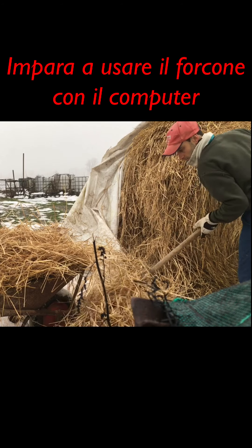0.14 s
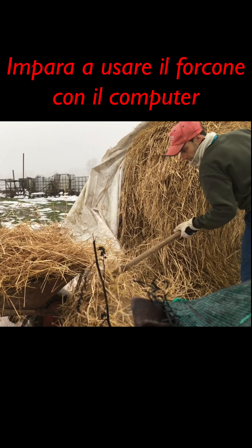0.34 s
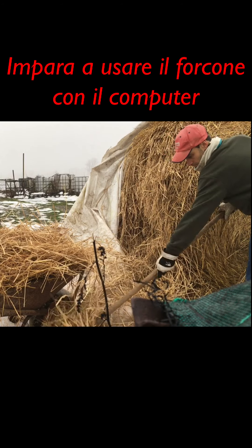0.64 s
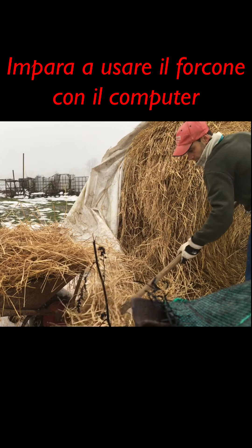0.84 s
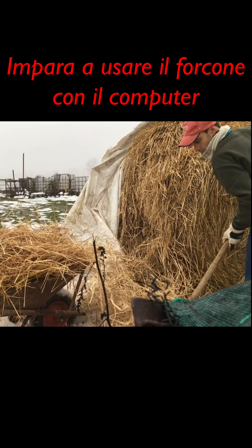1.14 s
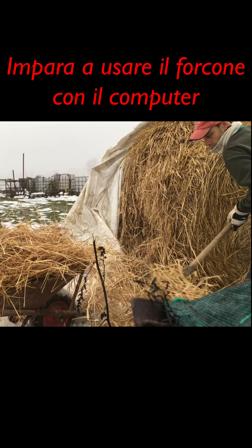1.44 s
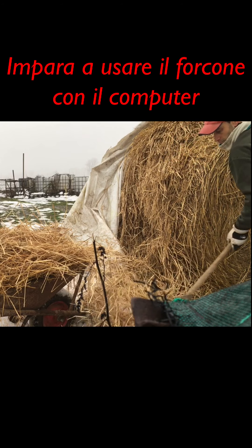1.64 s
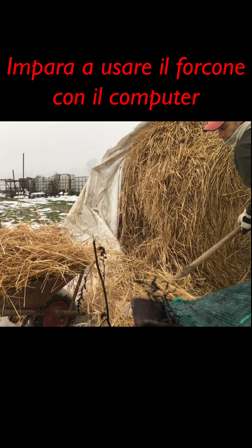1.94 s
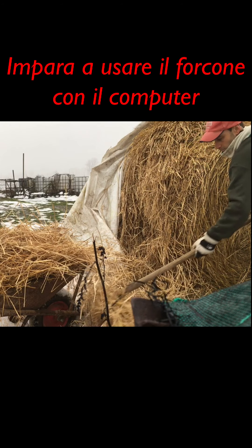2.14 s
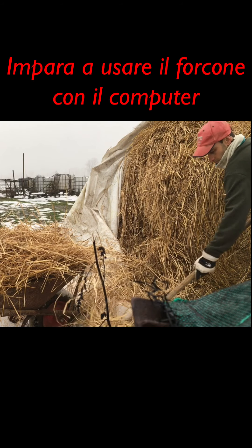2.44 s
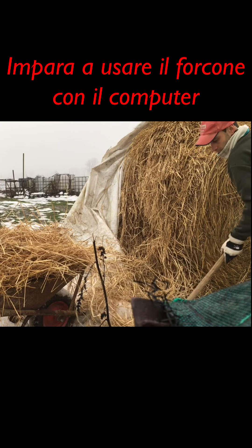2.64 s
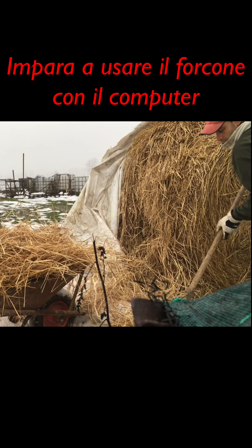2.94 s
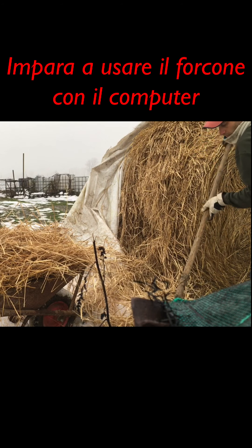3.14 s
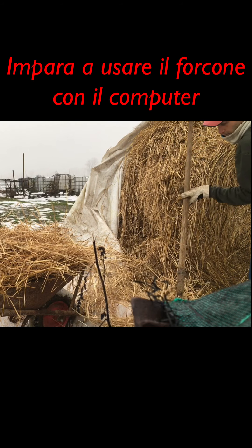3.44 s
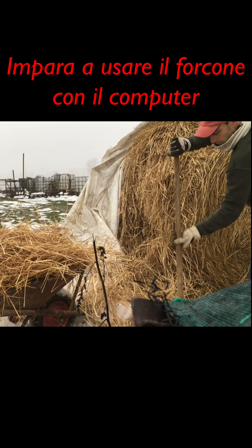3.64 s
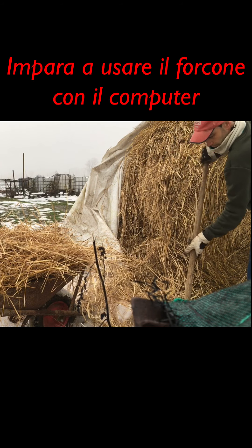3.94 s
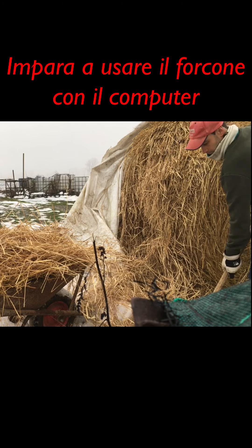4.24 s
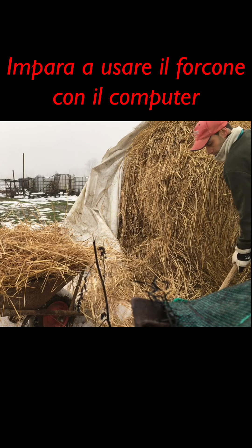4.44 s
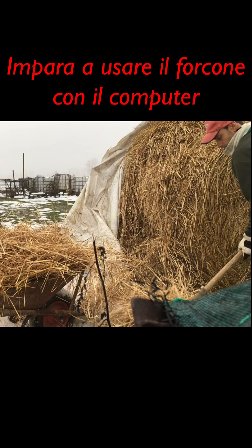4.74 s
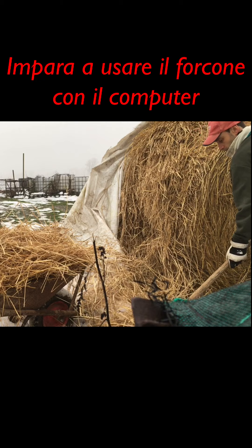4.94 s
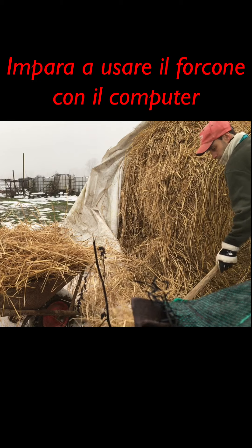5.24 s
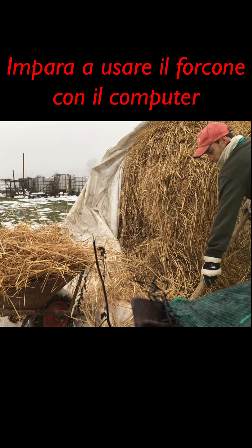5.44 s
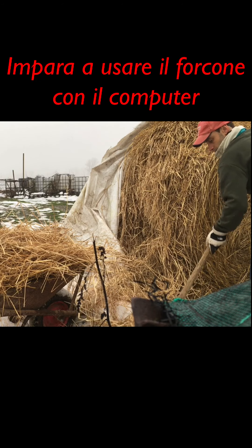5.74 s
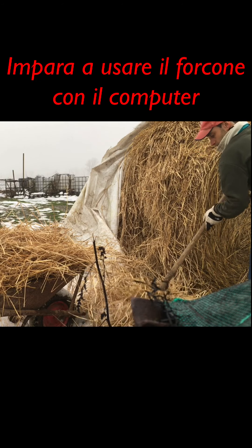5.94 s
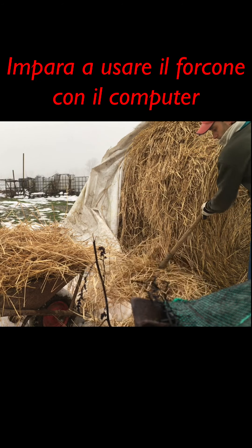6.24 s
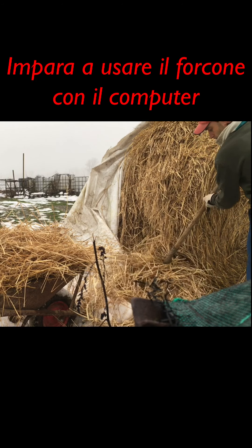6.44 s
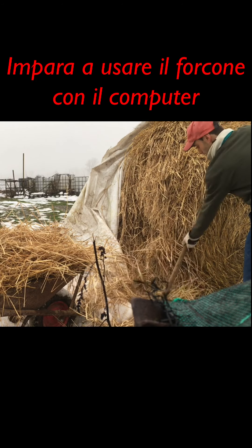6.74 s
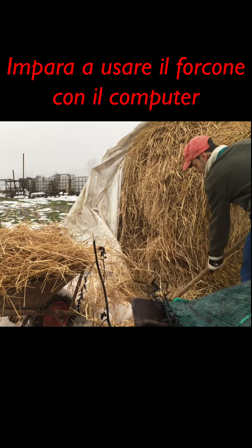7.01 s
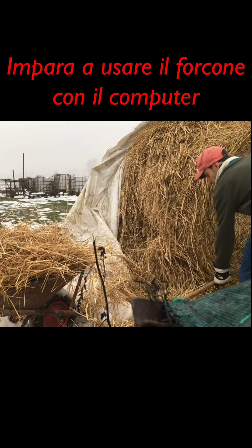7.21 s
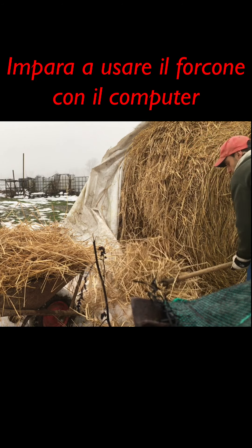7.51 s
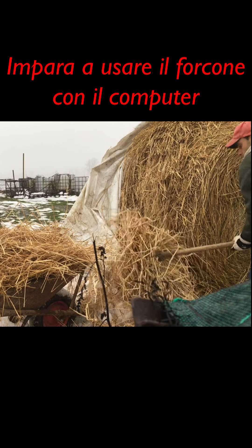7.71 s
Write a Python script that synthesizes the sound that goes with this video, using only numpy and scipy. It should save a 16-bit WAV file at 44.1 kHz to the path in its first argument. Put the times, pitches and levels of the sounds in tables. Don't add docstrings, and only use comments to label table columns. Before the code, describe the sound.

Dry straw rustles and crackles in sweeping fork strokes, with a hen clucking briefly, stems snapping, hollow knocks and a faint distant cock crow.

```python
import sys
import numpy as np
from scipy import signal
from scipy.fft import rfft, irfft, next_fast_len
from scipy.io import wavfile
from scipy.ndimage import uniform_filter1d, map_coordinates

SR = 44100
rng = np.random.default_rng(int(sys.argv[2]) if len(sys.argv) > 2 else 0)


def file_out(sig):
    cols = np.atleast_2d(sig).T
    lim = np.clip(cols, -1, 1)
    pcm = np.round(lim * 32767).astype(np.int16)
    wavfile.write(sys.argv[1], SR, pcm)


def rack_gain(trim_db):
    fader = np.asarray(trim_db, float)
    return 10 ** (fader / 20)


N = 347067


def unit(x):
    return x / np.sqrt(np.mean(x ** 2) + 1e-20)


def along(points, hz):
    f, v = np.transpose(points)
    return np.interp(np.log(hz + 1), np.log(f + 1), v)


def curves(rows, t):
    s, *cols = np.transpose(rows)
    return [np.interp(t, s, c) for c in cols]


def wobble(rate):
    knots = rng.standard_normal(int(N * rate / SR) + 4)
    return map_coordinates(knots, [np.arange(N) * rate / SR])


def coloured(x, gain):
    m = next_fast_len(x.shape[-1] + 8192)
    return irfft(rfft(x, m) * gain(np.fft.rfftfreq(m, 1 / SR)), m)[..., :x.shape[-1]]


def add(track, s, sound):
    part = track[round(s * SR):][:len(sound)]
    part += sound[:len(part)]


# drag below, crackle between, rustle above [f/Hz]
SPLIT_HZ = [1494, 5470]


def thirds(hz):
    low = 1 / (1 + (hz / SPLIT_HZ[0]) ** 6)
    high = 1 / (1 + (SPLIT_HZ[1] / (hz + 1)) ** 10)
    return np.sqrt(np.abs([low, (1 - low) * (1 - high), high]))


def patchy_noise(patchy_db):
    z = signal.stft(rng.standard_normal(N + 512), nperseg=256)[2]
    field = uniform_filter1d(rng.standard_normal(z.shape), 6, 0)
    field = uniform_filter1d(field, 10, 1)
    return unit(signal.istft(z * rack_gain(patchy_db * unit(field)), nperseg=256)[1][:N])


# [f/Hz, density/dB]
RUMBLE = [(15, -45), (25, -46), (39, -1), (53, 1), (68, 2.5), (77, -6.5), (85, 8), (93, -4), (100, 3),
          (112, -7), (160, -10.5), (220, -22.5), (300, -39), (500, -44)]
# [f/Hz, density/dB]
AIR = [(120, -22), (200, 5.5), (455, -9), (816, -7), (2030, -17.5), (2820, -6.5), (4880, -14.5),
       (9250, -8.5), (15700, -6)]


def yard():
    rumble_db, sway_db, hiss_db = -50.5, 1, -60
    rumble = unit(coloured(rng.standard_normal(N), lambda hz: rack_gain(along(RUMBLE, hz))))
    hiss = unit(coloured(patchy_noise(patchy_db=3.5), lambda hz: rack_gain(along(AIR, hz))))
    return rack_gain(rumble_db + sway_db * wobble(4.14)) * rumble + rack_gain(hiss_db) * hiss


# [t/s, length/s, f/Hz, level/dB]
CROW = [
    (5.38, 0.73, 701, -71.5),
    (6.265, 0.15, 700, -69),
    (6.41, .06, 693, -72.5),
    (6.585, .065, 817, -68),
    (6.67, 0.083, 875, -73),
    (6.745, 0.06, 810, -70),
]


def crow():
    out, waver = np.zeros(N), wobble(35)
    for s, length, hz, db in CROW:
        t = np.arange(0, length, 1 / SR)
        level = rack_gain(db + 5.5 + 1.7 * waver[round(s * SR):][:len(t)])
        swell = np.abs(np.sin(np.pi * t / length))
        add(out, s, level * swell * np.sin(2 * np.pi * hz * t))
    return out


def hen_call(slur, cluck, pitch):
    s, rise, hold, top, db = slur
    catch_db, break_db, cluck_db, overtone_db, half = cluck
    sagged, mid, low, length, _ = pitch
    onset_s, break_s, fade_s = .006, .0045, .006
    onset_db, start = -2, .71
    end = s + rise + hold
    press = end + 2 * break_s
    done = press + length
    dull = 20 * (low > 900)
    return [(s, start * top, db - 14, -25, 0),
            (s + min(onset_s, rise / 2), (start + .13) * top, db + onset_db, -25, 0),
            (s + rise, top, db, -24, 0),
            (s + rise + .6 * hold, .97 * top, db + catch_db, -25, 0),
            (end, sagged, break_db, -25, 0),
            (end + break_s, mid, .4 * break_db + .6 * cluck_db - 2, overtone_db - 9, .5 * half),
            (press, low, cluck_db, overtone_db, half),
            (done, low, cluck_db - 6, overtone_db - 2 - dull, .6 * half),
            (done + fade_s, low, cluck_db - 24, overtone_db - 4 - dull, .5 * half)]


# [t/s, rise/s, hold/s, top f/Hz, level/dB]
SLURS = [
    (2.054, .014, .027, 1360, -56.5),
    (2.215, .010, .028, 1440, -47),
    (2.324, .006, .023, 1170, -67),
    (2.643, .025, .013, 1390, -45),
    (2.753, .028, .012, 1380, -47),
]
# [catch before break/dB, voice break/dB, level/dB, overtones/dB, half-pitch share/1]
CLUCKS = [
    (-8, -56, -57, -6, .6),
    (-3, -40, -50, 7, 0.1),
    (1, -56, -65, 13, 0),
    (1, -46.5, -56.5, 14, 0.3),
    (0, -45, -55, 10.5, 0.55),
]
# [before break f/Hz, in break f/Hz, cluck f/Hz, cluck length/s, highest overtone by beak opening f/Hz]
CLUCK_HZ = [
    (1260, 850, 1060, .018, 2000),
    (1330, 900, 555, .005, 1400),
    (1050, 610, 603, .004, 2200),
    (1200, 640, 610, .008, 3200),
    (1250, 800, 625, .007, 3200),
]
# [f/Hz, gain/dB]
THROAT = [(300, -25), (900, -6), (1200, 3.5), (1800, 3.5), (2400, -2), (3000, -17), (4000, -40)]


def hen():
    out = np.zeros(N)
    for slur, cluck, pitch in zip(SLURS, CLUCKS, CLUCK_HZ):
        call, beak_hz = hen_call(slur, cluck, pitch), pitch[-1]
        t = np.arange(call[0][0], call[-1][0], 1 / SR)
        hz, db, overtone_db, half = curves(call, t)
        order = np.arange(3, 13)[:, None] / 2
        share = np.where(order % 1, np.clip(half, 0, 1), 1)
        share = share / (1 + (order * hz / beak_hz) ** 10)
        phase = 2 * np.pi * np.cumsum(hz) / SR
        overtones = (share * rack_gain(along(THROAT, order * hz)) * np.sin(order * phase)).sum(axis=0)
        add(out, t[0], rack_gain(db) * (np.sin(phase) + rack_gain(overtone_db) * overtones))
    t = np.arange(SR // 5) / SR
    echo = rng.standard_normal(len(t)) * rack_gain(-60 * t / 0.068)
    return out + rack_gain(-13) * signal.fftconvolve(out, echo / np.linalg.norm(echo))[:N]


# [t/s, peak/dB, f/Hz]
HOLLOW = [(4.4798, -25.5, 414), (4.483, -29, 370), (4.528, -31, 690), (6.812, -37, 660), (6.87, -46, 680),
          (4.4785, -38, 1000), (4.526, -34, 900), (4.6085, -23.5, 1090), (4.6105, -22.5, 697),
          (4.616, -33, 800), (6.219, -40.5, 500), (5.695, -42, 860), (5.832, -41, 1000), (6.798, -37, 695),
          (6.814, -49, 323), (7.437, -47, 500), (7.471, -44, 850), (7.485, -44, 980), (7.495, -46, 650),
          (7.505, -44, 1150), (7.519, -43, 700), (7.545, -45, 800), (7.559, -36.5, 700), (7.560, -41, 1550),
          (7.565, -43, 1050), (7.577, -39, 690), (7.589, -42, 720), (7.594, -47, 377), (7.602, -44, 1050),
          (7.647, -41, 977), (7.648, -46, 1500), (7.728, -37.5, 1120), (7.749, -46, 993),
          (7.796, -41.5, 670), (7.797, -47, 1300), (7.833, -43, 1280), (7.834, -49, 800)]
# [t/s, peak/dB]
THUMPS = [(0.901, -48), (1.247, -49), (3.739, -59), (3.753, -41), (4.476, -42), (4.523, -37.5),
          (4.61, -34.5), (4.69, -49), (5.83, -45), (6.799, -45), (6.815, -38.5), (7.47, -46.5),
          (7.565, -42.5), (7.595, -48)]


def thuds():
    hollow_t60, thump_t60 = 0.023, 0.11
    out, t = np.zeros(N), np.arange(SR // 5) / SR
    for s, db, hz in HOLLOW:
        note = np.sin(2 * np.pi * hz * t) * (1 - np.exp(-t / 0.0013))
        add(out, s, rack_gain(db - 2 - 60 * t / hollow_t60) * note)
    for s, db in THUMPS:
        puff = coloured(rng.standard_normal(len(t)), lambda f: np.exp(-(np.log((f + 1) / 190) / 0.73) ** 2))
        add(out, s, rack_gain(db - 4.5 - 60 * t / thump_t60) * unit(puff) * (1 - np.exp(-t / 0.0035)))
    return out


# [f/Hz, level/dB, t60/s]
TINES = [(2260, 5, 0.024), (2490, -4, 0.033), (1860, -10, .02)]
# [f/Hz, t60/s, rise/s]
UPPER_TINE = (3740, 0.034, 0.0047)
# [t/s, peak/dB, upper mode/dB]
STRIKES = [
    (0.8869, -40, -3),
    (0.9133, -42, -14),
    (1.0267, -38, 3),
    (1.0715, -39.5, -2),
]


def tines():
    out, t = np.zeros(N), np.arange(SR // 10) / SR
    upper_hz, upper_t60, upper_rise = UPPER_TINE
    upper = rack_gain(-60 * t / upper_t60) * np.sin(2 * np.pi * upper_hz * t)
    upper *= 1 - np.exp(-(t / upper_rise) ** 2)
    for s, db, upper_db in STRIKES:
        ring = np.zeros(len(t))
        for hz, level, t60 in TINES:
            ring += rack_gain(level + rng.normal(0, 1.3) - 60 * t / t60) * np.sin(2 * np.pi * hz * t)
        ring *= 1 - np.exp(-t / .001)
        damped = rack_gain(2.2 * uniform_filter1d(rng.standard_normal(len(t)), size=60) * 8)
        add(out, s, rack_gain(db - 3) * damped * (ring + rack_gain(upper_db + 8) * upper))
    return out


# [t/s, peak/dB, f/Hz, t60/s]
STEMS = [(1.0268, -27, 2300, .005), (1.0269, -36, 2200, .02), (4.126, -41, 9650, .015),
         (4.203, -41, 3900, .008), (4.3598, -42, 2350, .012), (4.4685, -38, 2600, .01),
         (4.4782, -33, 2500, .005), (4.5243, -29, 3050, .018), (4.5246, -35, 5300, .006),
         (4.526, -32, 2200, .01), (4.6088, -28, 2900, .005), (4.6092, -27, 1800, .008),
         (4.6102, -29, 3600, .006), (4.6115, -31, 1500, .012), (4.6095, -36, 5800, .008),
         (5.6172, -27, 2560, .02), (5.6174, -31, 8700, .025), (5.6174, -32, 11200, .012),
         (5.6177, -28, 4600, .006), (5.6195, -35, 5400, .015), (5.6205, -30, 2580, .02),
         (5.6225, -36, 8800, .015), (5.7288, -34, 2620, .025), (6.7505, -43, 2490, .025),
         (3.7385, -37, 3300, .025), (3.7415, -35, 1100, .02), (3.7425, -32, 2700, .01),
         (3.7455, -34, 3000, .01), (3.757, -34, 1300, .025), (3.756, -35, 9500, .025),
         (3.7582, -30, 4500, .005), (3.7572, -35, 7100, .012), (3.7515, -36, 2100, .015),
         (3.7165, -39, 2600, .025), (3.705, -40, 1100, .018), (3.7215, -40, 900, .02)]


def stems():
    rise_s, rough_db = .0003, 2.5
    out, t = np.zeros(N), np.arange(SR // 16) / SR
    for s, db, hz, t60 in STEMS:
        rough = rack_gain(rough_db * unit(uniform_filter1d(rng.standard_normal(len(t)), size=30)))
        note = np.sin(2 * np.pi * hz * t) * (1 - np.exp(-t / rise_s))
        add(out, s, rack_gain(db - 60 * t / t60) * rough * note)
    return out


# [t/s, peak/dB, tick over peak/dB, ring f/Hz, t60/s]
SNAPS = [(1.0265, -28, -11, 2900, 0.03), (1.063, -37, -14, 3000, .03), (1.0725, -37, -14, 2800, .035),
         (1.1646, -34, -2, 3000, .05), (1.614, -40, -10, 2340, .04), (2.4294, -39, -6, 3700, .045),
         (2.576, -32, -8, 3770, .05), (2.6313, -31, -8, 3820, .05), (3.05, -46, 11, 2850, .04),
         (4.0458, -38.5, -8, 2000, .03), (4.0979, -32, 11.5, 2880, .03), (4.1013, -30.5, -11, 3300, .03),
         (4.1185, -41, -8, 3200, .025), (4.1262, -43, 4, 3050, .025), (4.181, -45, -8, 3070, .03),
         (4.203, -41, -10, 3900, .015), (4.2269, -50, -8, 2070, .025), (4.2853, -30, -1.5, 1980, 0.019),
         (4.3272, -47, -8, 3200, .03), (4.36, -51, -13, 2600, .03), (4.4015, -44, -8, 3000, .04),
         (4.5546, -36, -12, 1700, .04), (4.5686, -33, -8, 3500, .03), (4.579, -34, -11, 3070, 0.06),
         (4.585, -37, -11, 3000, 0.05), (4.597, -32, -14, 2970, .06), (4.6608, -36, -11, 2800, .05),
         (4.668, -36, -11, 3100, .06), (4.6753, -31, -8, 3000, 0.066), (4.682, -35.5, -8, 3600, .05),
         (4.698, -39, -6, 3000, .03), (5.604, -39, -8, 2940, 0.035), (5.6156, -35, 4, 3300, 0.02),
         (5.6169, -21, 6, 4940, 0.034), (5.6200, -28, -3, 4280, .04), (5.7287, -30, -14, 2670, .04),
         (5.818, -27.5, -8, 3410, .06), (6.221, -39, -10, 3000, .04), (6.7503, -39, -1, 2490, .045),
         (7.039, -53, 16.5, 2700, .035), (7.0599, -50, -4, 2340, .04)]
# [t/s, peak/dB, tick over peak/dB, ring f/Hz, low part over peak/dB]
KNOCKS = [(0.7182, -38.5, 1, 3660, -6), (1.2582, -36, -7, 2750, -7), (2.743, -34, -7, 2290, -9),
          (3.3977, -54, -5, 2810, -5.5), (3.7045, -40, -4, 1600, -5), (3.7102, -42, 4, 3000, -15),
          (3.7164, -35, -8, 2600, -16), (3.7216, -32, -6, 3690, -10), (3.7345, -32, -8, 2800, -15),
          (3.7407, -29, -11, 3100, -12), (3.7455, -34, -8, 2900, -5), (3.7512, -32, -6, 2100, -17),
          (3.7570, -28.5, 1, 1400, -5), (3.7625, -34, -6, 1400, -3), (4.2384, -43, 6, 1900, -5),
          (4.4678, -32, -5, 2480, -18), (4.4777, -30, -4, 2200, -3), (4.4775, -38, -4, 4200, -20),
          (4.4970, -39, -10, 1600, -5), (4.5238, -27, -7.5, 3800, -10), (4.5264, -30, -12, 1900, -3.5),
          (4.6079, -27.5, -12, 2390, 0.5), (4.611, -31, -9, 3000, -20), (7.2605, -52.5, 4, 1880, -7),
          (7.3075, -58, 12, 3750, -5.5), (7.147, -52, -3, 2000, -8), (7.315, -49, -10, 2000, -4),
          (2.991, -49.5, 10, 3000, -10), (3.5695, -49, 10, 3000, -15), (.2035, -46, 10, 3000, -11)]
# [f/Hz, gain/dB]
SNAP = [(90, -30), (200, -6), (800, 0), (2600, -0.5), (4000, -1), (5600, -2.5), (7300, -4), (9000, 7),
        (15500, -1)]
# [share of t60/1, rise/s]
SNAP_SHAPE = [(0.83, 0.0025), (0.99, 0.00065), (0.66, 0.00022)]


def knocks():
    snap_thud_db, knock_t60 = -24, 0.018
    out, t = np.zeros(N), np.arange(SR // 16) / SR
    share, rise = np.transpose(SNAP_SHAPE)[:, :, None]
    contacts = [(*row[:4], snap_thud_db, row[4]) for row in SNAPS]
    contacts += [(*row, knock_t60) for row in KNOCKS]
    for s, db, tick_db, hz, thud_db, t60 in contacts:
        life = max(t60, .005) * rack_gain(0.1 * (db + 34))
        stalk = lambda f: 1 + np.exp(-(np.log((f + 1) / hz) / 0.1) ** 2)
        crack = rng.standard_normal(len(t))
        crack[SR // 2000] += 5
        bands = coloured(crack, lambda f: rack_gain(along(SNAP, f)) * stalk(f) * thirds(f))
        rebound = 1 + 0.11 * np.exp(-((t / life - .13) / 0.046) ** 2)
        bands *= rack_gain(-60 * t / (life * share)) * rebound * (1 - np.exp(-t / rise))
        bands /= np.abs(bands).max(axis=1, keepdims=True)
        low, middle, tick = bands
        ring = rack_gain(-60 * t / life) * np.sin(2 * np.pi * hz * t) * (1 - np.exp(-t / 0.00087))
        blow = rack_gain(thud_db) * low + 0.57 * middle + 0.1 * ring + rack_gain(tick_db) * tick
        add(out, s, rack_gain(db - 0.5) * blow)
    return out


def grains(per_second, spread_db, life_s):
    chance, size = rng.random(N), rng.exponential(1, N)
    starts = (chance < per_second / SR * rack_gain(4 * wobble(60))) * rack_gain(spread_db * np.minimum(size, 5))
    decay = [1, -np.exp(-1 / (life_s * SR))]
    shape = signal.lfilter([1], decay, starts)
    shape = signal.lfilter([1], decay, shape)
    return unit(shape * rng.standard_normal(N))


# [peak t/s, rise/s, fall/s, rustle/dB, stalks over rustle/dB]
SWEEPS = [(.15, .25, 0.046, -40, -17), (.45, 0.99, 0.52, -40.5, -14.5), (.75, 0.28, 0.12, -39.5, -10),
          (1.05, 0.4, 0.21, -38, -11), (1.2, 0.16, 0.28, -38.5, -11), (1.38, 0.37, 0.49, -43.5, -16.5),
          (1.7, 0.068, 0.18, -37, -18), (1.8, 0.21, 0.21, -38.5, -11.5), (2.0, .1, 0.21, -50, -16),
          (2.33, 0.36, 0.24, -41.5, -14.5), (2.43, 0.083, 0.11, -38, -10.5), (2.437, .012, .03, -38, -22),
          (2.582, .012, 0.018, -35, -18), (2.594, .01, 0.023, -44, -22), (2.58, 0.15, 0.35, -38, -10),
          (2.72, 0.21, 0.14, -40, -13), (2.83, 0.092, 0.071, -42, -10), (3.05, 0.35, 0.21, -47, -10.5),
          (3.62, 0.81, 0.25, -46.5, -14.5), (3.72, 0.079, 0.044, -37, -12.5),
          (3.742, 0.023, .02, -34.5, -9), (3.758, 0.015, 0.047, -35, -12), (4.72, 0.2, 0.34, -45, -14.5),
          (4.95, 0.14, 0.26, -46, -12), (5.27, 0.074, 0.31, -49, -29), (5.41, 0.29, 0.29, -41, -11),
          (5.62, 0.16, 0.27, -47, -6.5), (5.76, 0.076, 0.21, -38, -8.5), (5.86, 0.17, 0.51, -38.5, -9.5),
          (6.2, 0.23, 0.25, -47.5, -8.5), (6.1, 1, 0.37, -37.5, -28), (6.31, 0.25, 0.16, -36.5, -19.5)]
# [peak t/s, rise/s, fall/s, rustle/dB, stalks over rustle/dB]
SCRAPES = [
    (3.26, 0.13, 0.11, -49.5, -15),
    (3.9, 0.29, 0.65, -56.5, -12),
    (4.35, 0.19, .2, -71, -7),
    (4.1, 0.061, 0.093, -48, -8),
    (4.24, .15, 0.1, -52.5, -7.5),
    (4.404, 0.01, .15, -50.5, -8),
    (4.54, 0.11, 0.078, -47, -3.5),
    (4.61, .08, 0.12, -46, -4),
    (5.63, 0.032, 0.27, -50, -7),
]
# [peak t/s, rise/s, fall/s, rustle/dB, stalks over rustle/dB]
LIFTS = [
    (6.58, 0.27, 0.34, -46, -21),
    (6.81, 0.12, 0.071, -35, -17),
    (6.97, .15, .2, -55.5, -19),
    (7.14, .3, 0.13, -52.5, -20.5),
    (7.4, 0.087, .3, -44, -16.5),
    (7.55, 0.17, 0.54, -42, -15),
    (7.85, 0.32, .3, -43.5, -20.5),
]
# [rustle/dB, stalks/dB, drag/dB]
SETTLING_DB = [-69, -79.5, -69]


def strokes():
    drop_db, roundness = 13, 1.385
    t = np.arange(0, N + 64, 64) / SR
    power = rack_gain(np.array(SETTLING_DB))[:, None] ** 2
    for rows, drag_db in (SWEEPS, -11.5), (SCRAPES, -2.5), (LIFTS, -4):
        for s, rise, fall, db, stalk_db in rows:
            away = np.where(t < s, (s - t) / max(rise, .01), (t - s) / max(fall, .01))
            layers_db = db + np.array([[0], [stalk_db], [stalk_db + drag_db]])
            power = power + rack_gain(layers_db - drop_db * away ** roundness) ** 2
    return [np.interp(np.arange(N) / SR, t, g) for g in np.sqrt(power)]


# [t/s, added to top of rustle/dB]
TOSSES = [(.1, 3.5), (.75, 10.5), (1.2, 3), (2.1, 2), (2.5, 7), (3.1, 2.5), (4.75, 4), (5.2, 1), (5.6, 0.5),
          (6.2, 2.5), (7.8, 2)]


def chaff():
    rest_db, spread_s = -5, 0.35
    t = np.arange(N) / SR
    return rack_gain(rest_db + sum(db * np.exp(-((t - s) / spread_s) ** 2) for s, db in TOSSES))


# [f/Hz, density/dB]
STRAW = [(90, -41), (170, -34), (300, -12.5), (460, -17.5), (700, -13.5), (1800, -13.5), (2730, -8),
         (4000, -8), (5750, -6), (7580, -4.5), (9000, 4), (12000, 7), (14800, 8.5), (15700, 9)]
# [t/s, gain/dB]
LIES = [(.4, -0.5), (1.2, -1), (1.8, -1), (2.5, -2.5), (3.2, 0.1), (3.9, -1), (4.7, -0.5), (5.4, -5),
        (6.1, 0.7), (6.8, 1), (7.5, 0.5)]


def straw():
    lie_hz, lie_width_hz = 8100, 1400
    fine, stalks, heavy = strokes()
    near = grains(per_second=1200, spread_db=-2, life_s=0.00012)
    coarse = grains(per_second=150, spread_db=2.0, life_s=0.00087)
    blur = patchy_noise(patchy_db=1.0) * rack_gain(0.56 * wobble(55) + 0.28 * wobble(130))
    drive = np.array([blur + 0.39 * near + 0.2 * coarse,
                      blur + 0.5 * near + 0.19 * coarse,
                      blur + 0.39 * near + 0.32 * coarse])
    drag, crackle, rustle = coloured(drive, lambda hz: rack_gain(along(STRAW, hz)) * thirds(hz))
    airy = lambda hz: 1 / (1 + (11000 / (hz + 1)) ** 8) + 1.67 * np.exp(-((hz - 6200) / 900) ** 2)
    top = coloured(rustle, airy)
    lower = coloured(rustle, lambda hz: np.exp(-((hz - lie_hz) / lie_width_hz) ** 2))
    lie = rack_gain(curves(LIES, np.arange(N) / SR)[0])
    rustle = rustle + (chaff() - 1) * top + (lie - 1) * lower
    return fine * unit(rustle) + stalks * unit(crackle) + heavy * unit(drag)


def scene():
    background = yard() + crow() + hen()
    contacts = thuds() + tines() + stems() + knocks()
    return np.tile(background + contacts + straw(), (2, 1))


# [f/Hz, width/Hz, gain/dB]
DIPS = [(4950, 750, -5), (10450, 500, -5.5)]


def low_pass(x):
    return signal.sosfilt(signal.butter(12, 17010, fs=SR, output="sos"), x)


def record(dry):
    top_hz = 15740
    notches = lambda f: rack_gain(sum(db * np.exp(-((f - c) / w) ** 2) for c, w, db in DIPS))
    heard = coloured(dry, lambda f: notches(f) * (f < top_hz))
    heard = heard / (1 + np.abs(heard / .115) ** 4) ** .25
    return low_pass(heard)


dry = scene()
out = record(dry)
file_out(out)
```